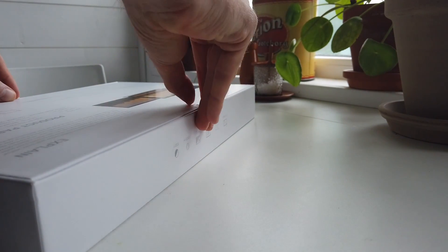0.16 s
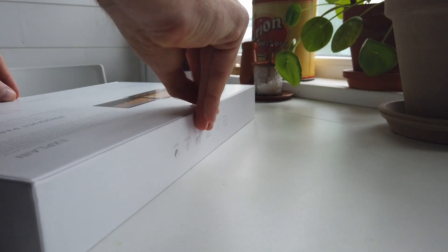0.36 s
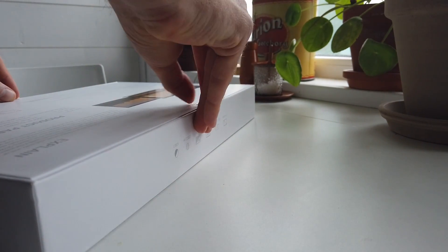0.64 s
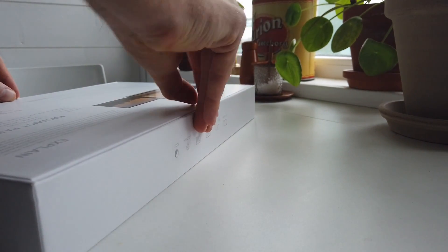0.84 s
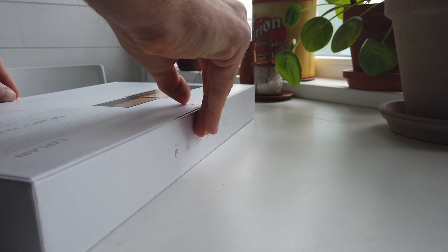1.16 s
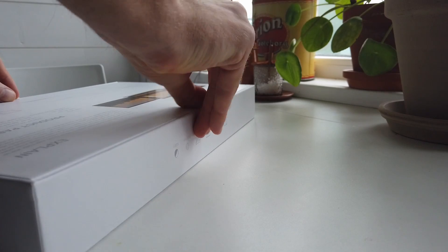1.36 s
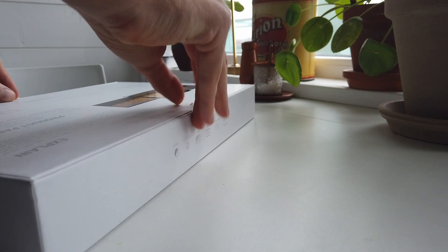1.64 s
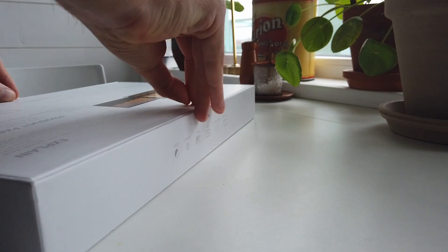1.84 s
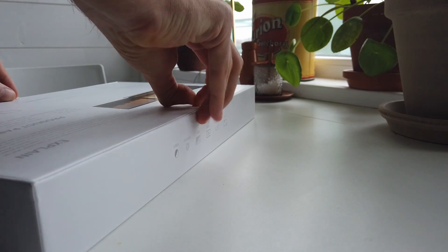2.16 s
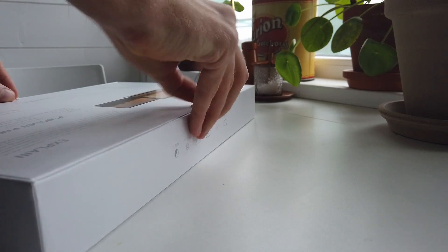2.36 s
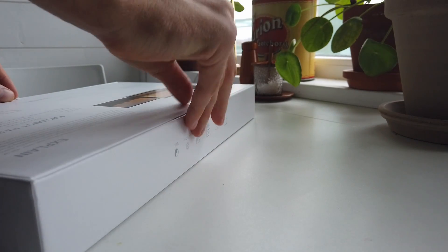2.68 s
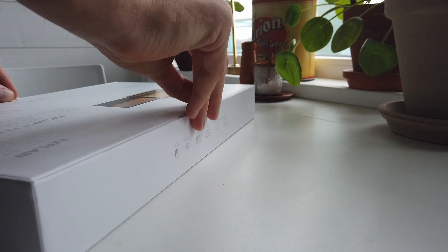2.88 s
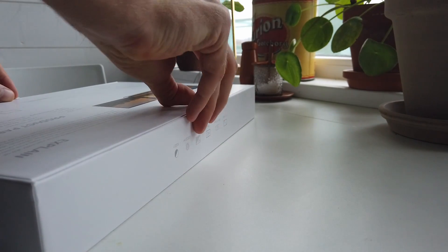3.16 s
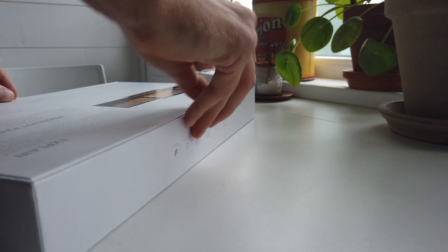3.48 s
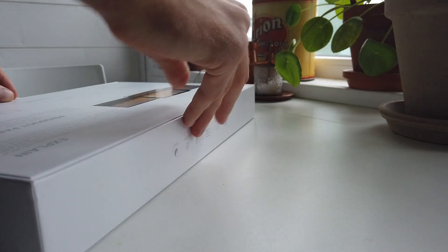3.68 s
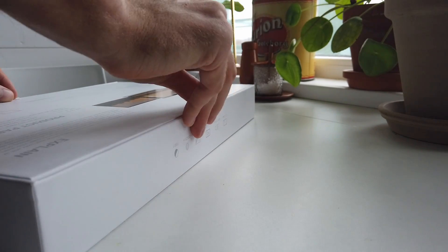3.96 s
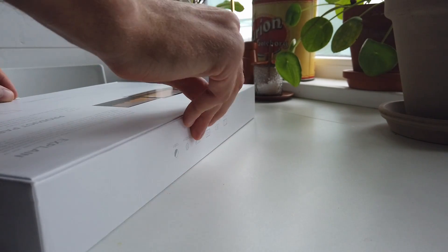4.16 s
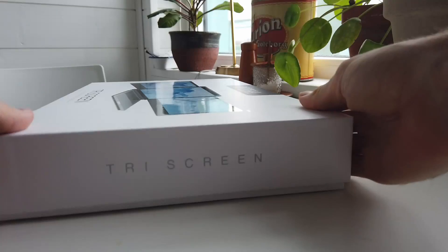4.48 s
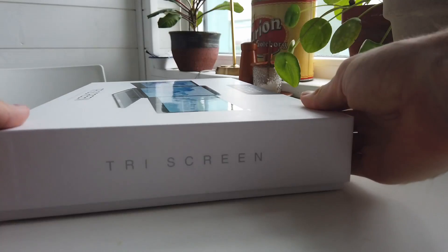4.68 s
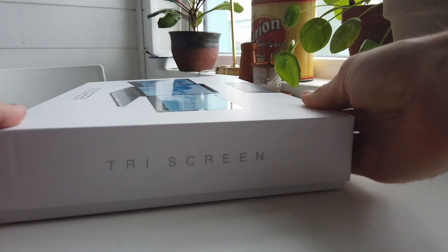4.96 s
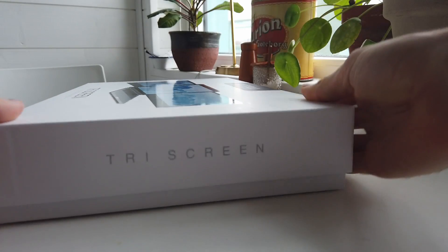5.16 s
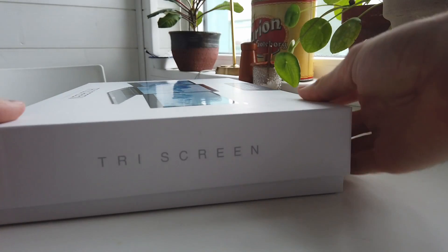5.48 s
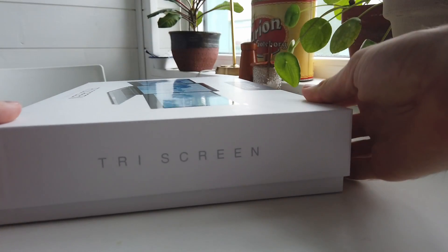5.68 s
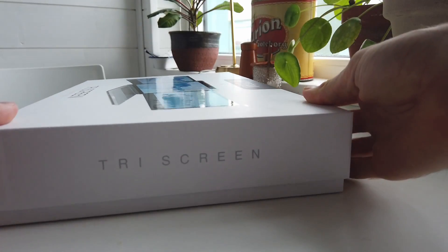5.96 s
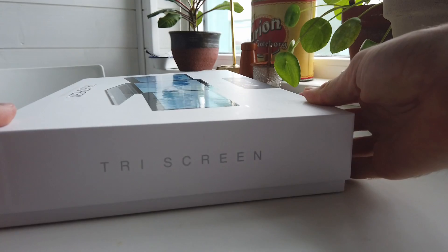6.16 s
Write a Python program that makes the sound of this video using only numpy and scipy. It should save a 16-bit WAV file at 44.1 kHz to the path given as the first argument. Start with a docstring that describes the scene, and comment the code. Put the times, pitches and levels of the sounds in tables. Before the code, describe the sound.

Fingertips knock hard four times on a rigid cardboard box, scratching between, then its tight lid jerks and rasps upward off the base.

```python
"""A small room, the microphone close to a rigid cardboard box on a table, a low rumble and faint hiss behind.
Fingertips knock, click and rub on the lid; later the tight lid is jerked up and slid off its base.
Knocks are decaying box modes, clicks short cracks of noise; rubbing is noise that rings the box, scrapes
and hisses. A short creak glides upward, hard blows shudder the table, and decaying noise is the room."""
import sys
import numpy as np
from scipy import signal
from scipy.fft import rfft, irfft, next_fast_len
from scipy.io import wavfile
from scipy.ndimage import uniform_filter1d, map_coordinates

SR = 44100
rng = np.random.default_rng(int(sys.argv[2]) if len(sys.argv) > 2 else 0)


def master(y):
    """Save y as 16-bit WAV."""
    cut = np.clip(np.atleast_2d(y).T, -1, 1)
    pcm = np.round(cut * 32767)  # scale
    wavfile.write(sys.argv[1], SR, pcm.astype(np.int16))


def gain_from_db(level_db):
    """Turn a decibel level (scalar or array-like) into a linear amplitude factor."""
    decades = np.asarray(level_db, float) / 20
    return 10 ** decades


N = 278712  # samples
LID_UP_S = 4.45  # from here on the lid is raised


def unit(x):
    """Scaled to rms 1."""
    return x / np.sqrt(np.mean(x ** 2) + 1e-20)


def along(points, hz, axis=1):
    """One column of (Hz, ..) points read on a log frequency axis."""
    rows = np.array(points, float)
    return np.interp(np.log(hz + 1), np.log(rows[:, 0] + 1), rows[:, axis])


def wobble(rate):
    """A smooth random curve, rate knots a second."""
    knots = rng.standard_normal(int(N * rate / SR) + 4)
    return map_coordinates(knots, [np.arange(N) * rate / SR])


def filtered(x, response):
    """x passed through a complex response of frequency."""
    m = next_fast_len(len(x) + 8192)
    hz = np.fft.rfftfreq(m, 1 / SR)
    return irfft(rfft(x, m) * response(hz), m)[:len(x)]


def noise(spectrum, grit_db=0., rate=300):
    """Coloured noise of rms 1, grainy where grit_db is above 0."""
    grains = rng.standard_normal(N) * gain_from_db(grit_db * wobble(rate))
    return unit(filtered(grains, lambda hz: gain_from_db(along(spectrum, hz))))


# The low rumble and the room's hiss. Each row: frequency in Hz, relative density in dB.
RUMBLE_SPECTRUM = [(8.8, -28.5), (15, 2), (31, 5.5), (53, -8), (86, -4), (113, -14), (172, -19),
                   (220, -24.5), (290, -42), (480, -120)]
AIR_SPECTRUM = [(88, -28), (150, -6), (354, -9.5), (534, -9.5), (649, -15), (998, -17.5), (1100, -15.5),
                (1690, -19), (8730, -27.5), (15100, -35), (16000, -52)]


def floor():
    """A low rumble wavers at random under a faint room hiss."""
    rumble = gain_from_db(-46 + 2.2 * wobble(6.4)) * noise(RUMBLE_SPECTRUM)
    air = gain_from_db(-65 + .8 * wobble(15)) * noise(AIR_SPECTRUM)
    return rumble + air


# The walls' answer. Each row: frequency in Hz, t60 in seconds, strength of the answer in dB.
ROOM_ANSWER = [(100, 0.55, -9), (290, 0.21, -5.5), (800, .27, -10.5), (2000, 0.25, -11.5), (4830, .3, -7.5),
               (9000, 0.24, -9), (14000, 0.53, -18)]


def room(x, span=SR // 10, size=SR // 2):
    """Each frequency of the walls' answer dies at its own speed; the echoes are drawn afresh every tenth of a second."""
    out = np.zeros(N + SR)
    for start in range(0, N, span):
        hz, t, z = signal.stft(rng.standard_normal(size), SR, nperseg=256)
        decay = gain_from_db(-60 * t / along(ROOM_ANSWER, hz)[:, None])
        energy = np.mean(decay ** 2, 1, keepdims=True) * size
        strength = gain_from_db(along(ROOM_ANSWER, hz, axis=2))[:, None]
        tail = signal.istft(z * decay / np.sqrt(energy) * strength, SR, nperseg=256)[1]
        wet = signal.fftconvolve(x[start:start + span], tail)
        out[start + round(.003 * SR):][:len(wet)] += wet  # 3 ms on the way
    return out[:N]


# The table's shudder. Each row: frequency in Hz, relative density in dB.
TABLE_SPECTRUM = [(20, -40), (40, -6), (75, 2.0), (110, -4.0), (160, -29.5), (300, -120)]


def table():
    """Hard blows shake the table under the box: a low shudder that builds and dies."""
    blows, t = np.zeros(N), np.arange(SR // 2) / SR
    s, db = np.transpose(KNOCK_BLOWS)[:2]
    blows[np.round(s * SR).astype(int)] = gain_from_db(np.minimum(db, 0))
    shudder = gain_from_db(-35.5 - 60 * t / .5) * (1 - np.exp(-t / 0.0033))
    return signal.fftconvolve(blows, shudder)[:N] * noise(TABLE_SPECTRUM)


# A short creak of the pressed lid. Each row: time in seconds, pitch in Hz, level in dB, both wavering.
CREAK_GLIDE = [(2.578, 524, -60), (2.596, 603, -40.5), (2.61, 673, -49.5), (2.625, 750, -63)]


def creak():
    """Board slips on board at a rising, unsteady rate."""
    s, hz, db = np.transpose(CREAK_GLIDE)
    t = np.arange(N) / SR
    rate = np.interp(t, s, hz) * (1 + .09 * wobble(250))
    phase = 2 * np.pi * np.cumsum(rate) / SR
    heard = (t > s[0]) * (t < s[-1])
    gain = uniform_filter1d(gain_from_db(np.interp(t, s, db)) * heard, size=SR // 100)
    return gain * gain_from_db(1.3 * wobble(100)) * (np.sin(phase) + 0.043 * np.sin(2 * phase))


# Box modes with the lid down, then raised.
# Each row: frequency in Hz, relative level in dB, t60 in seconds before limits and damping.
SHUT_MODES = [(125.5, -14, 0.1), (243.7, -2, 0.035), (334, 1.5, 0.019), (485, -13, 0.071),
              (667.2, -6.5, 0.025), (784, -17.5, 0.12), (779.6, -2, 0.0098), (1132, -5.5, 0.029),
              (1129.6, -8.5, 0.034), (1320, -2.5, 0.014), (1511, -18, 0.044), (1810, -17.5, .03),
              (2283, -21, 0.034), (2637, -15, .012), (3200, -19.5, 0.018)]
RAISED_MODES = [(231, -8, 0.0079), (240, -16, 0.016), (350.5, 12, 0.018), (390, -2.5, 0.069),
                (581, -8, 0.038), (715, -8, 0.083), (772, 4.5, 0.022), (1053, -3.5, 0.026),
                (1158, -4, 0.035), (1540, -8.5, 0.028), (2080, -33, 0.0056)]


def ring(modes, hard_db, stray, damping=1.):
    """Ringing of the board, neighbouring modes in opposite phase; a hard tip favours the upper ones."""
    hz, db, t60 = np.transpose(modes)[:, :, None]
    t = np.arange(SR // 4) / SR
    upper = 1 / (1 + (560 / hz) ** 6)
    chance = rng.standard_normal((2, *hz.shape))
    level = db + hard_db * upper + 5 * stray * chance[0]  # where the touch lands sets each mode's share
    hz = hz * (1 + .05 * stray * chance[1])
    sign = -(-1.) ** np.arange(len(hz))[:, None]
    fading = gain_from_db(level - 60 * t * damping / np.clip(t60, .005, .12))
    onset = 1 - np.exp(-t / .0003)
    return np.sum(sign * fading * np.sin(2 * np.pi * hz * t), 0) * onset


# Quick fingertip swipes. Each row: peak time in seconds, rise in seconds, fall in seconds,
# scrape in dB, skin hiss over the scrape in dB.
SWIPE_STROKES = [(0.222, 0.018, .03, -61.5, -2.5), (0.401, 0.047, .06, -42, -24),
                 (.482, 0.037, .05, -49, -24), (.61, 0.054, .03, -61, -18.5),
                 (0.828, 0.042, .06, -52.5, -10.5), (1.062, 0.074, .04, -54, -32),
                 (1.334, 0.044, .03, -60, -6), (1.467, .04, 0.052, -37.5, -14.5),
                 (1.712, .015, .05, -57.5, -7.5), (1.755, .02, .02, -69.5, 6),
                 (1.808, 0.017, .05, -53, -12.5), (1.981, 0.11, .08, -45.5, -19),
                 (2.089, .03, 0.025, -56, -10), (2.18, 0.035, .08, -56.5, -13),
                 (2.48, .1, 0.34, -60.5, -15), (3.53, 0.067, .05, -66, -28), (4.14, 0.023, .05, -60, -19),
                 (5.27, 0.017, 0.03, -66, -14.5), (2.386, 0.068, .05, -59.5, -5),
                 (2.657, 0.012, .025, -47.5, 3.5), (2.79, .02, .04, -59, -5.5),
                 (2.973, 0.089, .08, -47.5, -9), (3.12, 0.078, .06, -50.5, -15.5),
                 (3.33, 0.034, .04, -64.5, -7), (4.062, 0.075, .06, -52.5, -2),
                 (4.51, 0.0099, 0.0087, -50.5, 2.5)]


def swipes(t):
    """Gains of drag, scrape and hiss as each swipe swells to a peak and fades."""
    range_db, drag_db = 31.5, -3  # fall from peak to either end; drag over scrape
    rounding = 1.4  # above 1: a round top and steep ends
    gains = np.zeros((3, N))
    for s, rise, fall, db, hiss_db in SWIPE_STROKES:
        away = np.maximum((s - t) / rise, (t - s) / fall)
        gains += gain_from_db(db - range_db * away ** rounding + [[drag_db], [0], [hiss_db]])
    return gains


def lead_ins(t):
    """Gain of drag and scrape alike as the finger brushes the board just before a hard blow."""
    lead_in_s, under_blow_db, range_db = 0.014, -46, 31.5
    gain = np.zeros(N)
    for s, db, _ in KNOCK_BLOWS:
        if db > -5:
            gain += (t < s) * gain_from_db(db + under_blow_db - range_db * np.abs(s - t) / lead_in_s)
    return gain


# Slow glides of a flat finger. Each row: start in seconds, length in seconds,
# hiss at the start in dB, hiss at the end in dB, both wavering.
FLAT_GLIDES = [(2.43, 0.17, -70.5, -67), (3.42, 0.204, -64, -56.5), (4.201, 0.207, -57.5, -60)]


def glides(t):
    """Gains of scrape and hiss for a flat finger, which is mostly hiss."""
    scrape_db, attack_s, release_s = -8.5, .02, 0.056  # scrape over hiss
    gains = np.zeros((2, N))
    for s, length, first_db, last_db in FLAT_GLIDES:
        end = s + length
        times = [s - attack_s, s, end, end + release_s, s + 2 * length]
        levels = [first_db - 19, first_db, last_db, last_db - 10, -100]
        level_db = np.interp(t, times, levels, left=-120) + wobble(33)
        gains += gain_from_db(level_db + [[scrape_db], [0]])
    return gains


# The tight lid sliding on its base. Each row: time in seconds, friction in dB.
LID_FRICTION = [(4.47, -46.5), (4.55, -35), (4.67, -49.5), (4.7, -38), (4.8, -48.5), (4.82, -36.5),
                (4.88, -51.5), (4.92, -40.5), (5.03, -54.5), (5.16, -45.5), (5.23, -47), (5.28, -41),
                (5.335, -52), (5.37, -40), (5.42, -43.5), (5.47, -47), (5.68, -51.5), (5.72, -58),
                (5.81, -53), (5.97, -60.5), (6.05, -48), (6.13, -47), (6.22, -42), (6.32, -43)]
# The edges bite and the rasp stands out. One row: from in seconds, to in seconds,
# added rasp at the start in dB, at the end in dB.
EDGE_CATCH = (5.35, 5.7, 10.5, 10.6)


def lid_slide(t):
    """Gains of drag, scrape and hiss: the lid's friction, whose rasp swings wider than its drag, and wavers a little."""
    friction_db = np.interp(t, *np.transpose(LID_FRICTION), left=-120)
    rasp_db = -63.5 + 1.2 * (friction_db + 45)
    rasp_db = rasp_db + np.interp(t, EDGE_CATCH[:2], EDGE_CATCH[2:], 0, 0) + 1.2 * wobble(25)
    return gain_from_db([friction_db, rasp_db, rasp_db - 18])


def strokes(t):
    """Gains of drag, scrape and hiss summed over swipes, glides, the resting hand and the sliding lid."""
    gains = swipes(t) + lid_slide(t)
    gains[0] += gain_from_db(-59.5 + 5.7 * wobble(18)) * (t < LID_UP_S)  # a still hand
    gains[:2] += lead_ins(t)
    gains[1:] += glides(t)
    return gains


# Skin scraping on board, the sliding lid's rasp, and the hiss of both.
# Each row: frequency in Hz, relative density in dB.
SCRAPE_SPECTRUM = [(410, -36), (700, -4), (884, -0.5), (977, -16.5), (1080, 4), (1650, -11.5), (2780, -9.5),
                   (10000, -25), (13000, -55.5), (22000, -120)]
RASP_SPECTRUM = [(1200, -2), (1700, 2.5), (2300, -5), (3150, 1.5), (3900, -5.5), (5500, -7.5), (8000, -16),
                 (12000, -25), (16000, -120)]
HISS_SPECTRUM = [(2940, -36), (5000, -8), (5590, -4.5), (6570, -10.5), (7380, -3), (10700, -2.5),
                 (14100, -8), (16000, -8.5)]


def rubbing():
    """Skin and lid sliding on board, stroke by stroke: slips ring the box, the surface scrapes and hisses."""
    t = np.arange(N) / SR
    lid_down = t < LID_UP_S
    drag, scrape, hiss = uniform_filter1d(strokes(t), size=SR // 200, axis=1)
    slips = drag * rng.standard_normal(N) * gain_from_db(2.7 * wobble(80))
    boards = [ring(modes, hard_db=-10, stray=0, damping=1.5) for modes in (SHUT_MODES, RAISED_MODES)]
    shut, raised = [signal.fftconvolve(slips, b / np.linalg.norm(b))[:N] for b in boards]
    skin = noise(SCRAPE_SPECTRUM, grit_db=2.5, rate=300)
    edge = noise(RASP_SPECTRUM, grit_db=2.5, rate=460)  # the sliding lid rasps in its own band
    scrape = scrape * np.where(lid_down, skin, edge) * gain_from_db(2.1 * wobble(40))
    hiss = hiss * noise(HISS_SPECTRUM, grit_db=3.5, rate=900) * gain_from_db(2.0 * wobble(30))
    return np.where(lid_down, shut, raised) + scrape + hiss


# Colour of a crack. Each row: frequency in Hz, relative density in dB.
SNAP_SPECTRUM = [(880, -15.5), (1500, -9), (3150, -12), (3770, -12), (4330, -15.5), (5070, -12.5),
                 (5710, -18.5), (7760, -15), (9190, -19), (16000, -36)]
# Nail and edge clicks. Each row: start in seconds, relative level in dB, relative brightness in dB, body in dB.
CLICK_TOUCHES = [(0.0387, -18.5, -2, -1), (0.2189, -48, -6, 4), (0.3659, -37.5, -21, 10),
                 (0.638, 1.5, -12, 0), (1.1343, -14.5, -8.5, 7), (1.3304, -52.5, -8, -10),
                 (1.4272, -38, -19, 8), (1.4536, -35.5, -26, -18), (1.5559, -17, -12, -9),
                 (1.6975, -46.5, 4, 11), (1.8005, -36.5, -22.5, -41), (1.8122, -48.5, 0, -7),
                 (1.9066, -44, -30, 16), (1.9609, -38, -29, -17), (2.38, -38.5, -6, -19),
                 (2.6504, -52.5, -1, 3), (2.6632, -37.5, -27, -19), (2.7766, -49, -3, 4.5),
                 (3.1182, -47.5, -18.5, -11), (3.7948, -35, 9, 6), (3.8181, -29.5, 0.5, 5),
                 (4.01, -53, -21, 0.5), (4.1143, -46.5, -22, 7), (4.5123, -18, 1.5, -29),
                 (4.529, -14, -16.5, -29), (4.6892, -32.5, -12, 2), (4.7324, -41.5, -6, 3),
                 (4.8115, -42, -4, 0), (4.8857, -41, 0.8, -13), (4.9095, -34.5, -3.5, -3.5),
                 (4.9888, -37.5, -36, -10.5), (5.1669, -50, -24.5, 3), (5.475, -45, -5, -6),
                 (5.618, -62, 16, -2), (5.8016, -48, -15, -3.5), (5.9274, -50.5, -14.5, -4),
                 (5.9883, -49.5, -6, -1.5), (6.1145, -44, -10, -22), (6.224, -47, -9, -3),
                 (6.2796, -30, -21, 0)]


def clicks():
    """A short crack of noise, tilted bright or dull; the walls hear it from all sides, with an even colour."""
    lead = SR // 100  # samples ahead of the onset
    out, t = np.zeros((2, N + SR)), np.arange(SR // 10) / SR - .01
    for s, db, bright_db, body_db in CLICK_TOUCHES:
        t60 = .012 if s < LID_UP_S else .018  # a nail on the shut lid, the edge of the raised lid

        def tilt(hz):
            bright = (bright_db + 9) / (1 + (6500 / (hz + 1)) ** 6)
            body = body_db / (1 + (hz / 2800) ** 6)
            return gain_from_db(along(SNAP_SPECTRUM, hz) + bright + body)

        shape = (t > 0) * gain_from_db(-60 * t / t60) * (1 - np.exp(-np.abs(t) / 0.00062))
        middle = np.linspace(2500, 6500, 40)  # Hz: the level is set in this band
        size = gain_from_db(db + 6) / np.sqrt(np.mean(tilt(middle) ** 2))
        crack = filtered(rng.standard_normal(len(t)), tilt) * shape
        impulse = np.linalg.norm(shape) * (np.arange(len(t)) == lead)
        even = filtered(impulse, tilt)
        out[:, round(s * SR) - lead:][:, :len(t)] += size * np.array([crack, even])
    return out[:, :N]


# Fingertip blows on the board. Each row: start in seconds, peak in dB,
# relative hardness in dB (upper modes against the lowest).
KNOCK_BLOWS = [(0.039, 0.5, -4.5), (0.222, -35.5, -10.5), (0.364, -24.5, -14), (0.496, -31, -16),
               (0.638, 4.5, -7), (0.832, -31, -12), (0.879, -33.5, -21.5), (1.05, -32, -22.5),
               (1.132, -0.5, -12.5), (1.314, -31, -18.5), (1.341, -34, -20), (1.428, -21.5, -12.5),
               (1.555, -2, -7), (1.697, -27, -10), (1.714, -33, -8), (1.802, -22.5, -15.5),
               (1.812, -33, -3.5), (1.829, -32, -8), (1.909, -24.5, -16.5), (2.354, -29, -29),
               (2.382, -28.5, -6), (2.569, -30.5, -20), (2.655, -24.5, -6.5), (2.661, -32.5, 11),
               (2.777, -25.5, -9.5), (2.834, -28, -17.5), (3.281, -41.5, -16.5), (3.43, -34, -24),
               (3.53, -30, -21.5), (3.627, -32.5, -26), (3.667, -39, -16.5), (3.758, -30.5, -21),
               (3.798, -29, -8), (3.816, -33.5, -10.5), (4.009, -37.5, 0), (4.185, -47, -19),
               (4.365, -35.5, -10), (4.523, -6, -29), (4.545, -17, -0.5), (4.689, -17, -2.5),
               (4.753, -24.5, -14), (4.812, -25.5, -13), (4.908, -26.5, -2), (5.037, -37.5, -9),
               (5.096, -34, -29), (5.17, -36, -14.5), (5.199, -35.5, -10), (5.409, -17.5, -20.5),
               (5.475, -35, 5.5), (5.924, -38.5, 2), (5.99, -32, 4.5), (6.151, -24, -9), (6.224, -15, -8),
               (6.281, -13, -1)]


def knocks():
    """Each blow rings the box; light touches land at random spots, and a resting hand damps the shut lid."""
    out = np.zeros(N + SR)
    for s, db, hard_db in KNOCK_BLOWS:
        shut, hard = s < LID_UP_S, db > -12
        stray = .15 if hard else .6
        light_damping = 1.9 if shut else 0.97  # a light touch stays on the board and alters its ring
        damping = 1 if hard else light_damping
        sound = ring(SHUT_MODES if shut else RAISED_MODES, hard_db + 3, stray, damping)
        db = min(db, 5)  # no blow is louder than this
        out[round(s * SR):][:len(sound)] += gain_from_db(db) * sound / np.abs(sound).max()
    return out[:N]


def scene():
    """Box sounds, their room and the background; a small box radiates little bass."""
    crack, even = clicks()
    low_hz = 150
    box = knocks() + creak() + rubbing()
    box = filtered(box, lambda hz: (1j * hz / (low_hz + 1j * hz)) ** 2)
    sideways_db = 3.0  # clicks spread evenly, the board beams upward
    answer = room(box + gain_from_db(sideways_db) * even)
    return (box + crack + table() + answer + floor())[None]


def roll_off(x):
    """The treble ends steeply here."""
    return signal.sosfilt(signal.butter(12, 16380, fs=SR, output="sos"), x)


def record(dry):
    """The loudest knocks clip the input, with a slightly rounded knee."""
    x = dry / (1 + np.abs(dry) ** 12) ** (1 / 12)
    return roll_off(x)


dry = scene()
out = record(dry)
master(out)
```